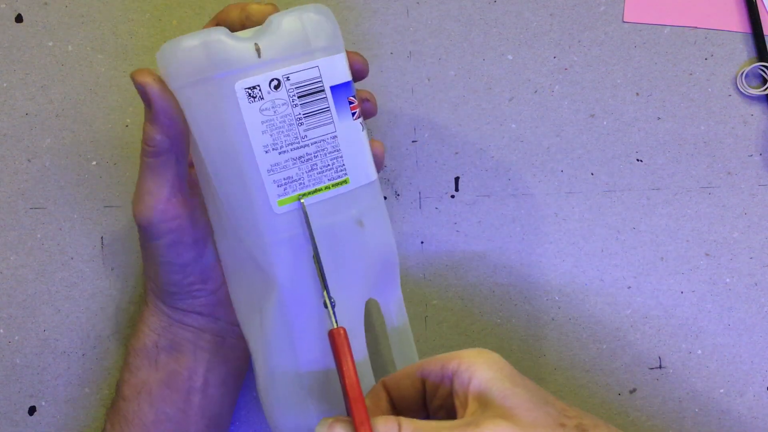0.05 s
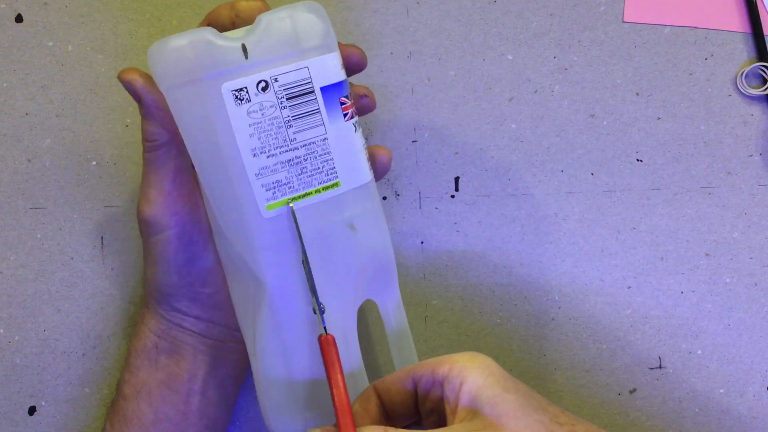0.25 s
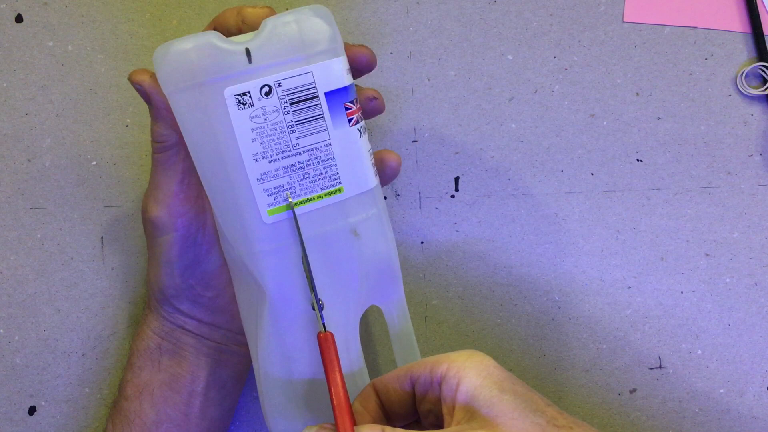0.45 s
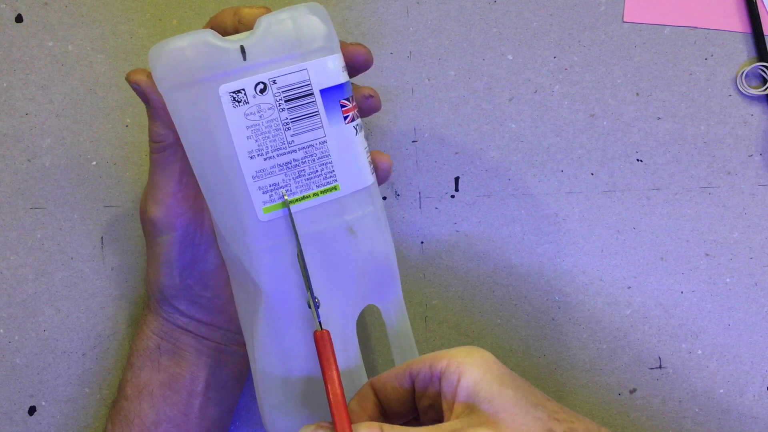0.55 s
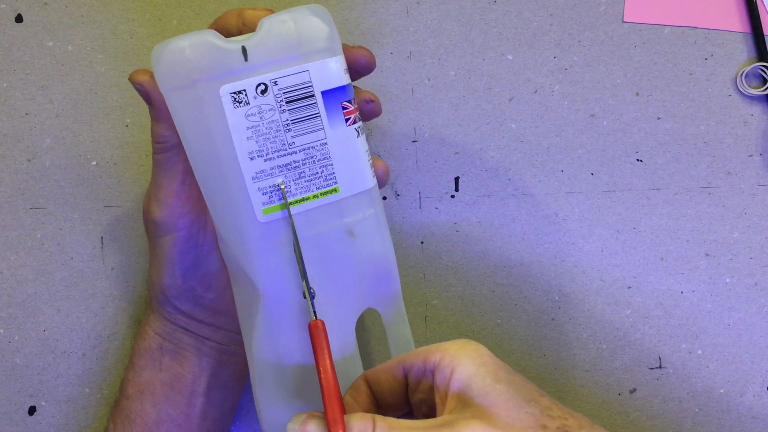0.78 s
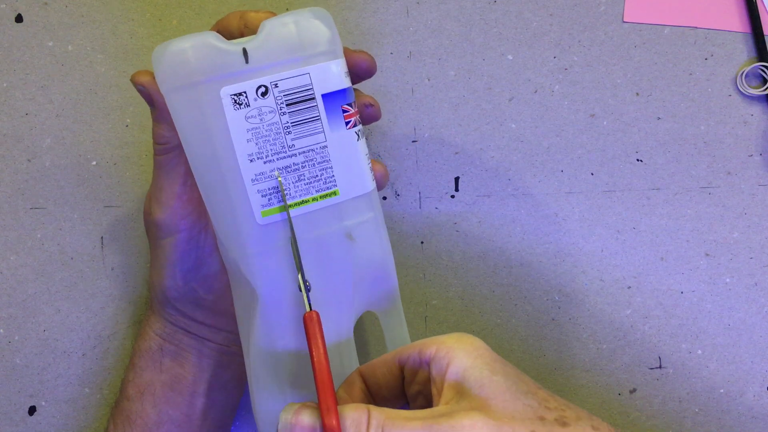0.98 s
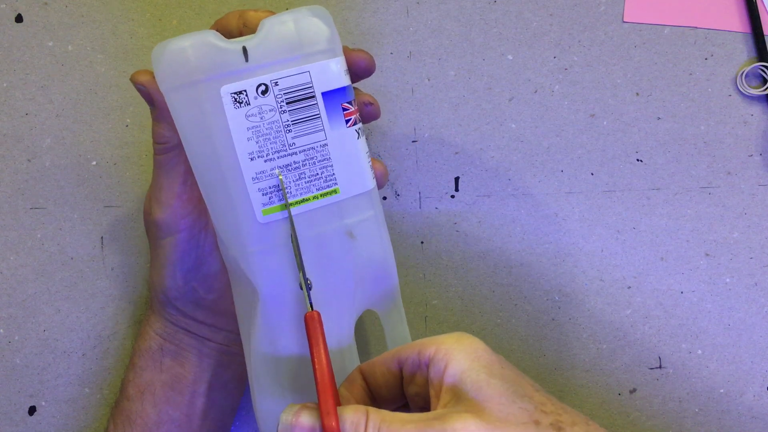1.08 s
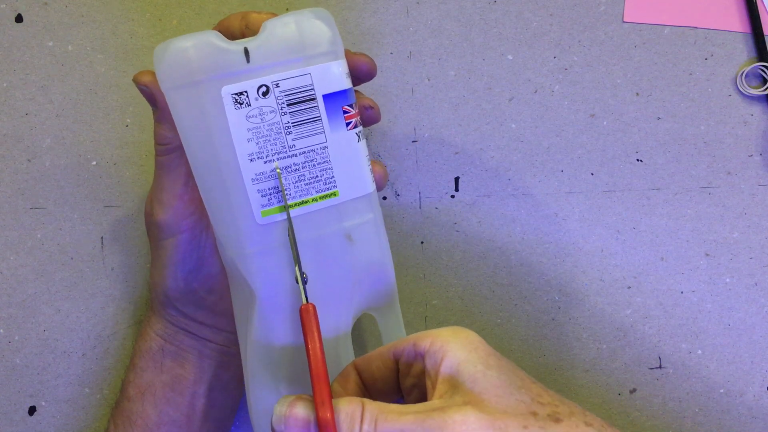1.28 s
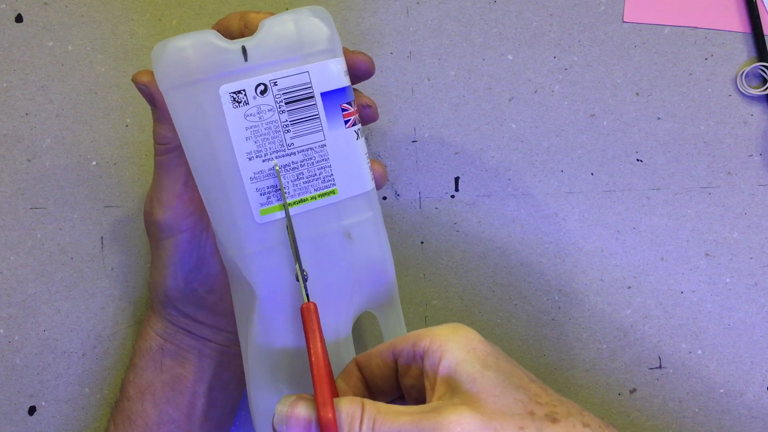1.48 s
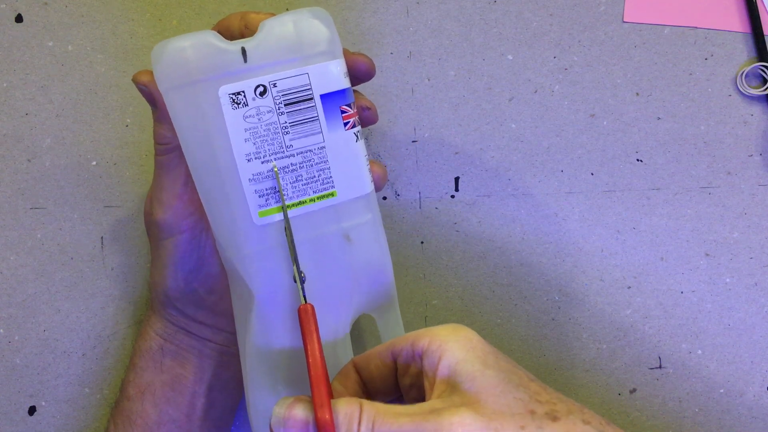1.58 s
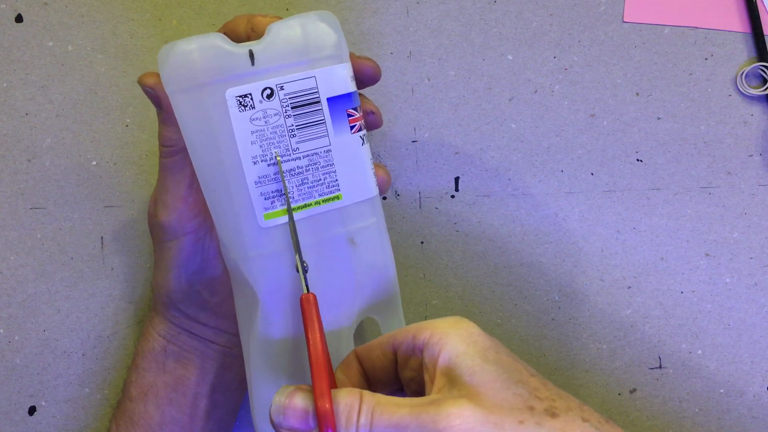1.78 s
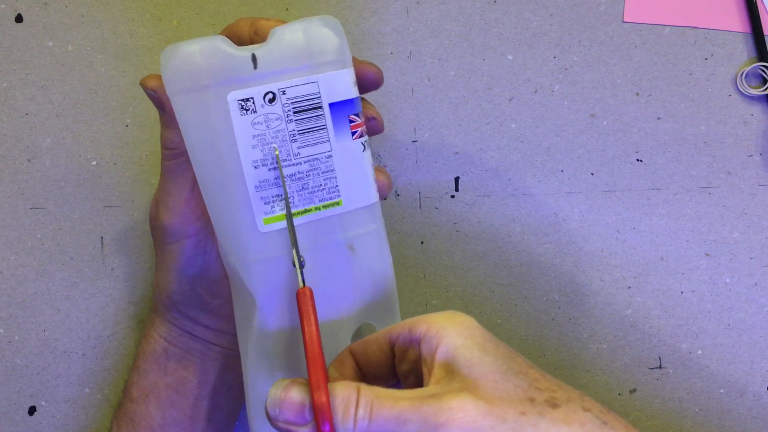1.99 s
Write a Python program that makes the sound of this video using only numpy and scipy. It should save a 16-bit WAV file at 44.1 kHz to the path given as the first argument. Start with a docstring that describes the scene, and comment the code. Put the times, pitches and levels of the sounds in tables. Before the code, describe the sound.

Scissors crunch slowly through a thin hollow plastic bottle, with knocks and a few sharp snaps

```python
"""A thin plastic bottle knocks and rustles in the hand in a small, hard room, then splits with a deep snap.
Scissors work along it, about three strokes a second: random stick-slip clicks, shaped by blade speed,
give a crunchy rasp on closing, at times with a squeak, and a lighter one on opening.
Midway comes a tiny crack, near the end a thin, bright snap: each a click, a run of breaks and reflections.
Throughout, knocks and jolts ring the hollow wall's modes over a quiet rumble and hiss of filtered noise."""
import sys
import numpy as np
from scipy import signal
from scipy.fft import rfft, irfft, next_fast_len
from scipy.io import wavfile

SR = 44100
rng = np.random.default_rng(int(sys.argv[2]) if len(sys.argv) > 2 else 0)


def digitize_waveform(pressure):
    """Quantize a signal to 16-bit integers and store it at the path in sys.argv[1].

    Rows of a 2-D input are taken as channels; values are limited to [-1, 1].
    """
    field = np.atleast_2d(pressure).T
    bounded = np.clip(field, -1, 1)
    quanta = np.round(bounded * 32767).astype(np.int16)
    wavfile.write(sys.argv[1], SR, quanta)


N = 90404
TIME = np.arange(N) / SR   # s

# The blades close. Each row: start in seconds, rise in seconds, fall in seconds, level in dB.
CUTS = [(0.664, 0.038, 0.022, -53.5), (0.979, 0.024, 0.027, -52.5), (1.322, 0.01, 0.05, -54.5),
        (1.678, 0.026, 0.028, -51.5), (2.032, 0.0099, .035, -49)]
# Spectrum of the closing rasp. Each row: frequency in Hz, relative level in dB.
CUT_COLOUR = [(110, -22.5), (180, -6), (230, -8.5), (396, 4), (633, -6.5), (1370, -12.5), (1650, -2.5),
              (2030, -14.5), (2590, -8), (2790, -7.5), (3430, -18), (5000, -18.5), (11200, -36),
              (14600, -39), (16000, -41)]
# A blade squeaks as it bites. Each row: start in seconds, level in dB.
SQUEAKS = [(0.686, -54.5), (.998, -57), (1.33, -60.5), (1.688, -57)]
# The blades open and slide on. Each row: start in seconds, rise in seconds, fall in seconds, level in dB.
SLIDES = [(0.487, 0.017, 0.031, -53.5), (0.528, 0.016, 0.03, -60.5), (0.824, 0.033, 0.028, -58),
          (1.113, 0.034, 0.012, -65.5), (1.142, 0.012, 0.025, -57), (1.376, 0.0057, 0.017, -56),
          (1.504, 0.031, 0.015, -54), (1.535, 0.014, 0.015, -56), (1.842, 0.016, 0.041, -57.5),
          (1.891, 0.015, 0.023, -53)]
# Spectrum of the opening rasp. Each row: frequency in Hz, relative level in dB.
SLIDE_COLOUR = [(110, -13.5), (180, -10), (257, -11), (354, 1), (764, -14.5), (824, -22), (994, -11),
                (1420, -22), (1750, -12), (2110, -23.5), (2400, -15.5), (2950, -22.5), (3630, -16.5),
                (4300, -20.5), (16000, -41)]
# The plastic splits. Each row: start in seconds, level in dB, length of the tear in seconds,
# level of the blow that rings the wall in dB, name of the colour.
SNAPS = [(0.337, -28.5, 0.012, -35.5, "deep"), (1.199, -54, .003, -76, "tiny"),
         (1.7295, -38, .012, -51.5, "thin")]
# Thick wall splits deep, thin sheet bright, a tiny split only cracks.
# Each name holds rows of: frequency in Hz, relative level in dB per Hz.
SNAP_COLOURS = {"deep": [(100, -26.5), (200, -9.5), (340, -6.5), (420, -14.5), (520, -3.5), (780, 1),
                (910, -19), (1250, -6.5), (1450, -19), (1650, -6.5), (2100, -15), (2650, -4.5), (3700, -8),
                (5000, -13), (7000, -22), (10000, -28.5), (14000, -29.5), (16000, -37)], "thin": [(100, -9),
                (350, -5.5), (780, -15), (1120, 1.5), (1330, -0.5), (1500, -18), (1750, -3.5), (2400, -10),
                (2800, -2), (3500, -6.5), (5700, -8), (7200, -19.5), (8200, -12.5), (9400, -13),
                (10600, -28.5), (12700, -19.5), (16000, -33)], "tiny": [(200, -3), (500, 9.5), (1000, 2),
                (2800, -5), (5500, -7.5), (9000, -20), (16000, -27)]}
# The wall flexes in the hand. Each row: start in seconds, level of the blow in dB,
# softness as a low-pass cut-off in Hz, pitch of the dent in Hz.
KNOCKS = [(0.038, -40.5, 610, 306), (.059, -56, 800, 408), (.089, -43, 1270, 315), (0.178, -48, 900, 394),
          (0.2065, -30, 430, 233), (.2070, -31.5, 450, 405), (.226, -41.5, 345, 226),
          (0.3403, -23.5, 900, 316), (.3460, -22.5, 840, 494), (0.556, -54, 490, 355),
          (0.7617, -44.5, 1110, 440), (.787, -49, 450, 250), (1.156, -62, 600, 364), (1.198, -45, 700, 393),
          (1.344, -49, 610, 309), (1.380, -46.5, 1075, 308), (1.517, -55.5, 900, 373),
          (1.7248, -32, 454, 320), (1.910, -47, 1124, 420)]
# Spectrum of the faint tick in a knock. Each row: frequency in Hz, relative level in dB.
TICK_COLOUR = [(200, -25.5), (700, -2), (1200, 3.5), (2800, -5.5), (6000, -16), (16000, -34)]
# Modes of the hollow wall. Each row: frequency in Hz, relative level in dB, 60 dB decay time in seconds.
WALL_MODES = [(221.4, -11.5, 0.098), (286, -9.5, .08), (353.4, -1, 0.17), (484, 3, 0.08), (534.4, -1, 0.15),
              (588, -1.5, 0.084), (660, -5, 0.2), (718, -5, 0.12), (777, -3, 0.13), (1190, -13, 0.043),
              (1288, -12, 0.14), (1592, -7, 0.25), (2575, -3.5, .12), (2722, -10, .12), (3780, -8.5, 0.17)]
# The whole bottle is jolted. Each row: start in seconds, level of the jolt in dB.
THUDS = [(.042, -52), (.074, -50), (.216, -49.5), (0.354, -47.5), (0.688, -52), (0.783, -54), (.986, -51.5),
         (1.208, -58), (1.34, -46), (1.556, -62.5), (1.692, -53), (1.724, -52), (1.746, -44)]
# The hand shifts on the bottle. Each row: time in seconds, level in dB.
RUSTLE = [(0, -58.5), (.045, -54), (.11, -64), (.18, -62), (.26, -62.5), (.32, -64.5), (.42, -79.5)]
# Spectrum of the rustle. Each row: frequency in Hz, relative level in dB.
RUSTLE_COLOUR = [(71, -34), (120, -3), (418, -0.5), (1140, -18), (1680, -13), (3980, -19), (4500, -20),
                 (10800, -36), (14400, -35), (16000, -41)]
# Spectrum of the room's rumble and hiss. Each row: frequency in Hz, relative level in dB.
FLOOR_COLOUR = [(15, -33), (25, -3.5), (134, 0), (317, -19.5), (463, -38), (796, -24), (1480, -37),
                (3820, -35.5), (5430, -29), (5880, -28.5), (7710, -38), (9570, -34.5), (16000, -45.5)]
# How long the room rings. Each row: frequency in Hz, 60 dB decay time in seconds.
ROOM_T60 = [(100, 0.16), (300, 0.15), (700, 0.2), (2000, 0.15), (5000, 0.19), (13000, 0.14)]

CUT_SLIPS_PER_S, SLIDE_SLIPS_PER_S, RUSTLE_SLIPS_PER_S = 1500, 3400, 1800
BITE_S, BITE_SHARE = 0.0036, 0.51   # the blades grip at once, then gather speed
SWELL_POWER = 0.82   # bends the whole stroke, bite included
SLIP_FLUTTER_DB, SLIP_FLUTTER_HZ = 2, 126   # rms depth, fastest wander
SQUEAK_HZ, SQUEAK_T60_S = 2770, 0.24
SQUEAK_RISE_S, SQUEAK_FALL_S = 0.014, 0.017
RUB_WALL_DB, RUB_SOFT_HZ = -32, 307   # friction also shakes the wall's low modes
TEAR_DB, TEAR_SLIPS_PER_S = 1, 1900   # a split runs on in tiny breaks
CRACK_DB, SNAP_ROOM_DB = -16, 6   # balanced against the tear
SNAP_SPAN_S = 0.02   # a snap's level is its rms over this span
DENT_T60_S, TICK_DB = 0.028, 11
WALL_DB, WALL_SPREAD_DB = -16, 2.5   # wall in the knocks; spread of strike strengths
THUD_HZ, THUD_T60_S, THUD_SOFT_HZ = [90.3, 127.4], 0.17, 200
FLOOR_DB = -69.5
ROOM_BUILD_S = 0.0044
CUTOFF_HZ = 16000


def cuts():
    """Closing blades crunch through the plastic in coarse stick-slip."""
    speed = strokes(CUTS)
    friction = speed * grip() * slips(CUT_SLIPS_PER_S, spread_db=1.5)
    return room(colour(friction, CUT_COLOUR), wet_db=-2)


def squeaks():
    """Friction briefly sets a blade singing: a noise-driven resonance with its level evened out."""
    level = strokes([(s, SQUEAK_RISE_S, SQUEAK_FALL_S, db) for s, db in SQUEAKS])
    resonance = ring(rng.standard_normal(N), SQUEAK_HZ, SQUEAK_T60_S)
    blade = np.cos(np.angle(signal.hilbert(resonance)))   # keeps only the phase
    return room(level * blade, wet_db=-19)


def slides():
    """Opening blades rub along the cut edges with a finer grain, and the wall hums along."""
    speed = strokes(SLIDES)
    friction = speed * grip() * slips(SLIDE_SLIPS_PER_S, spread_db=1.5)
    push = soften(friction, RUB_SOFT_HZ)
    rasp = room(colour(friction, SLIDE_COLOUR), wet_db=-1)
    return rasp + from_db(RUB_WALL_DB) * wall([push])


def snaps():
    """A crack, a short run of tiny breaks, its reflections, and the wall ringing on."""
    out = wall([from_db(ring_db) * click(s) for s, _, _, ring_db, _ in SNAPS])
    for s, db, tear_s, _, kind in SNAPS:
        running = (TIME >= s) * np.clip(1 - (TIME - s) / tear_s, 0, 1) ** 0.5
        breaks = running * slips(TEAR_SLIPS_PER_S, spread_db=-4)
        tear = from_db(TEAR_DB) * energy_one(breaks)
        crack = from_db(CRACK_DB) * click(s)
        echo = from_db(SNAP_ROOM_DB) * signal.fftconvolve(click(s), reflections())[:N]
        split = energy_one(crack + tear + echo)
        gain = from_db(db) * np.sqrt(SNAP_SPAN_S * SR)
        out = out + gain * colour(split, SNAP_COLOURS[kind])
    return out


def knocks():
    """The wall dents with a faint tick and a short dull pop that sets its modes ringing."""
    blows = [from_db(db) * click(s, soft_hz) for s, db, soft_hz, _ in KNOCKS]
    dents = sum(ring(blow, hz, DENT_T60_S) for blow, (*_, hz) in zip(blows, KNOCKS))
    pop = signal.sosfilt(signal.butter(2, 150, "high", fs=SR, output="sos"), dents)
    tick = from_db(TICK_DB) * colour(sum(blows), TICK_COLOUR)
    return room(pop, wet_db=-10.5) + room(tick, wet_db=6.5) + from_db(WALL_DB) * wall(blows)


def thuds():
    """Soft jolts make the held bottle boom in two low modes."""
    jolts = sum(from_db(db) * click(s, THUD_SOFT_HZ) for s, db in THUDS)
    return sum((-1) ** k * ring(jolts, hz, THUD_T60_S) for k, hz in enumerate(THUD_HZ))


def rustle():
    """The hand shifts on the plastic in a patter of even little slips."""
    level = from_db(np.interp(TIME, *np.transpose(RUSTLE)))
    friction = level * slips(RUSTLE_SLIPS_PER_S, spread_db=0)
    return room(colour(friction, RUSTLE_COLOUR), wet_db=-0.5)


def room_floor():
    """The room's quiet rumble and hiss: steady coloured noise."""
    return from_db(FLOOR_DB) * colour(rng.standard_normal(N), FLOOR_COLOUR)


def strokes(rows):
    """Sum of the strokes, each a swell at its own level."""
    return sum(from_db(db) * swell(s, rise, fall) for s, rise, fall, db in rows)


def swell(start, rise, fall):
    """Blade speed during one stroke: a quick bite, a climb, then a fall to rest."""
    bite = min(BITE_S, rise / 2)
    speed = np.interp(TIME - start, [0, bite, rise, rise + fall], [0, BITE_SHARE, 1, 0])
    return speed ** SWELL_POWER


def grip():
    """The blades catch and let go unevenly: a slow random wander in dB, scaled to rms 1."""
    wander = soften(rng.standard_normal(N), SLIP_FLUTTER_HZ)
    return rms_one(from_db(SLIP_FLUTTER_DB * rms_one(wander)))


def slips(per_s, spread_db):
    """Stick-slip friction: random clicks of either sign, their sizes set by the spread, rms 1."""
    sizes = from_db(spread_db * np.minimum(rng.exponential(1, N), 3))
    signs = rng.choice([-1, 1], N)
    happens = rng.random(N) < per_s / SR
    return rms_one(sizes * signs * happens)


def wall(blows):
    """The wall's modes; every blow strikes each with a strength of its own."""
    strengths = from_db(WALL_SPREAD_DB * rng.standard_normal((len(blows), len(WALL_MODES))))
    drives = strengths.T @ np.array(blows)   # one drive per mode
    out = np.zeros(N)
    for k, (hz, db, t60) in enumerate(WALL_MODES):
        out += (-1) ** k * from_db(db) * ring(drives[k], hz, t60)   # neighbours in opposite phase
    return out


def ring(x, hz, t60):
    """A two-pole resonance: a unit click sets off a dying sine of height 1."""
    r, w = from_db(-60 / (t60 * SR)), 2 * np.pi * hz / SR
    return signal.lfilter([0, np.sin(w)], [1, -2 * r * np.cos(w), r * r], x + 1e-18)


def click(s, soft_hz=None):
    """A unit click; a soft contact is low-passed."""
    x = np.zeros(N)
    x[int(s * SR)] = 1
    return x if soft_hz is None else soften(x + 1e-18, soft_hz)


def soften(x, hz):
    """Low-pass, as a soft contact or slow motion does."""
    return signal.sosfilt(signal.butter(2, hz, fs=SR, output="sos"), x)


def room(x, wet_db):
    """Direct sound plus reflections; the power is kept."""
    wet = from_db(wet_db)
    return (x + wet * signal.fftconvolve(x, reflections())[:N]) / np.hypot(1, wet)


def reflections():
    """Dense reflections of one click, dying band by band; energy 1."""
    t = TIME[:SR // 2]
    white, tail = rfft(rng.standard_normal(len(t))), 0
    hz = np.arange(len(white)) * SR / len(t)
    build = 1 - np.exp(-t / ROOM_BUILD_S)
    edges = np.geomspace(60, 18000, 26)   # Hz
    for low, high in zip(edges, edges[1:]):
        band = irfft(white * (hz >= low) * (hz < high), len(t))
        decay = from_db(-60 * t / at_hz(ROOM_T60, np.sqrt(low * high)))
        tail = tail + np.sqrt(high - low) * energy_one(band * decay * build)   # equal power per Hz
    return energy_one(tail)


def colour(x, spectrum):
    """Causal minimum-phase filter of unit power with the given spectrum."""
    size = next_fast_len(N + SR // 2) * 2
    hz = np.maximum(np.arange(size // 2 + 1) * SR / size, 20)
    log_gain = np.log(rms_one(from_db(at_hz(spectrum, hz))))
    cepstrum = irfft(log_gain)[:size // 2]
    cepstrum[1:] *= 2   # folding the cepstrum makes the filter causal
    return irfft(rfft(x, size) * np.exp(rfft(cepstrum, size)))[:N]


def at_hz(points, hz):
    """Read a table on a log-frequency axis."""
    f, value = np.transpose(points)
    return np.interp(np.log(np.maximum(hz, 1)), np.log(f), value)


def from_db(db):
    """Decibels to gain."""
    return 10 ** (np.asarray(db) / 20)


def rms_one(x):
    """Scale to rms 1."""
    return x / np.sqrt(np.mean(x ** 2) + 1e-20)


def energy_one(x):
    """Scale to energy 1."""
    return rms_one(x) / np.sqrt(len(x))


def scene():
    """Scissors and bottle over the room's quiet rumble and hiss, in one channel."""
    scissors = cuts() + squeaks() + slides()
    bottle = snaps() + knocks() + thuds() + rustle()
    return (scissors + bottle + room_floor())[None]


def record(dry):
    """The microphone drops the deep bass; the top is cut."""
    thin = signal.sosfilt(signal.butter(4, 55, "high", fs=SR, output="sos"), dry)
    return signal.sosfilt(signal.ellip(10, 0.2, 70, CUTOFF_HZ, fs=SR, output="sos"), thin)


dry = scene()
out = record(dry)
digitize_waveform(out)
```